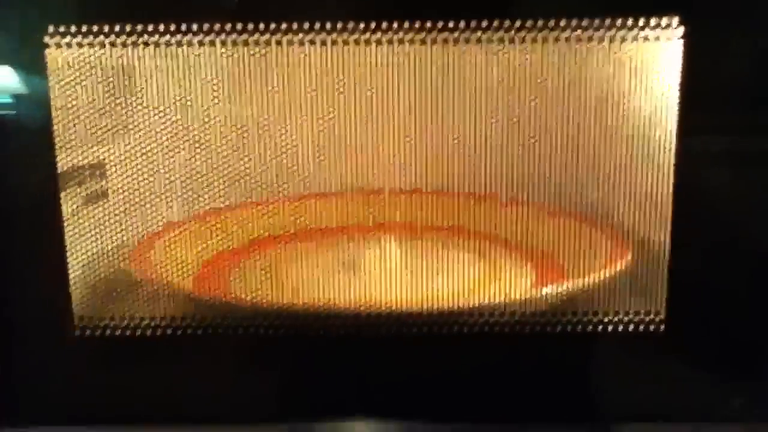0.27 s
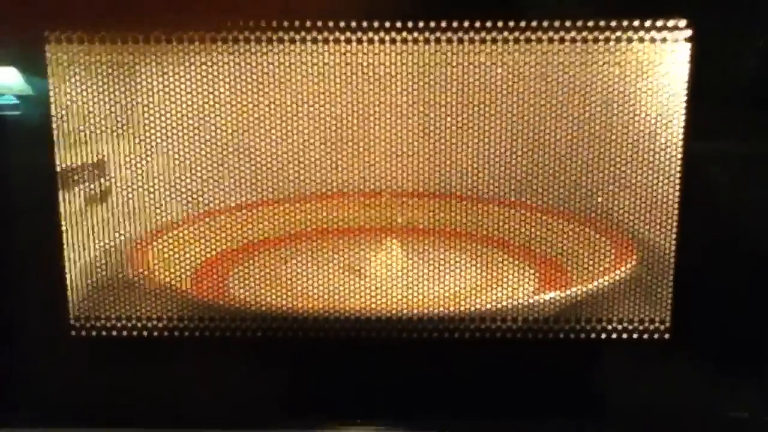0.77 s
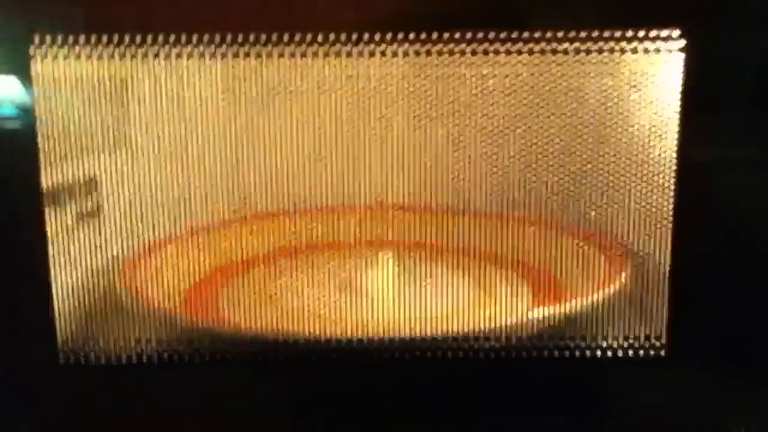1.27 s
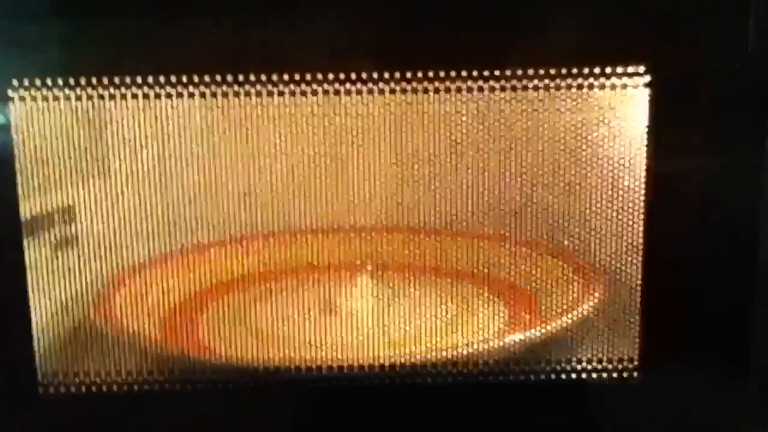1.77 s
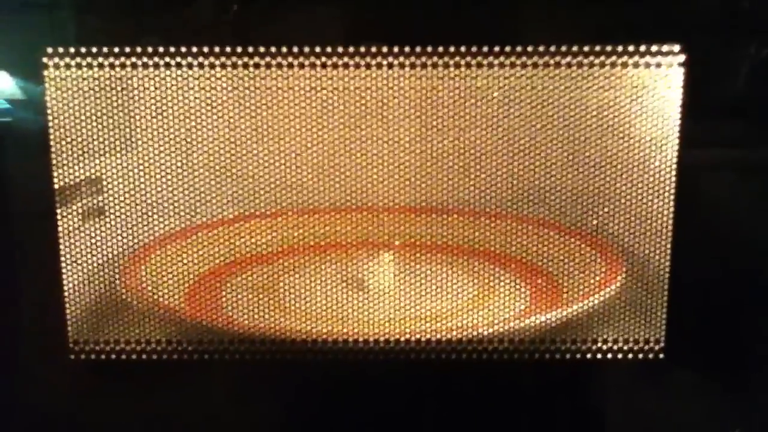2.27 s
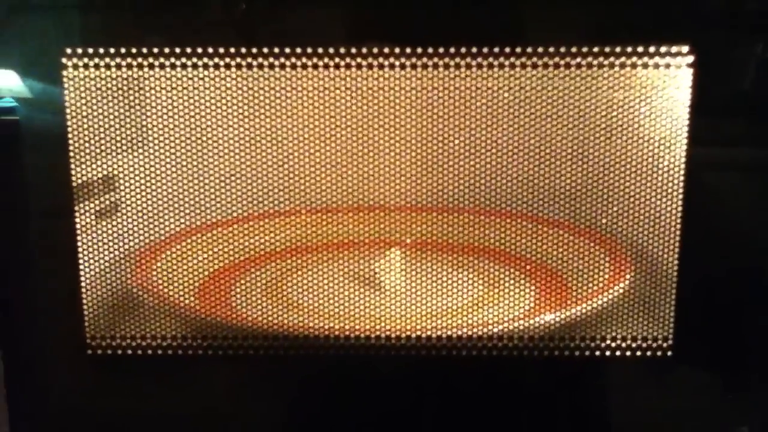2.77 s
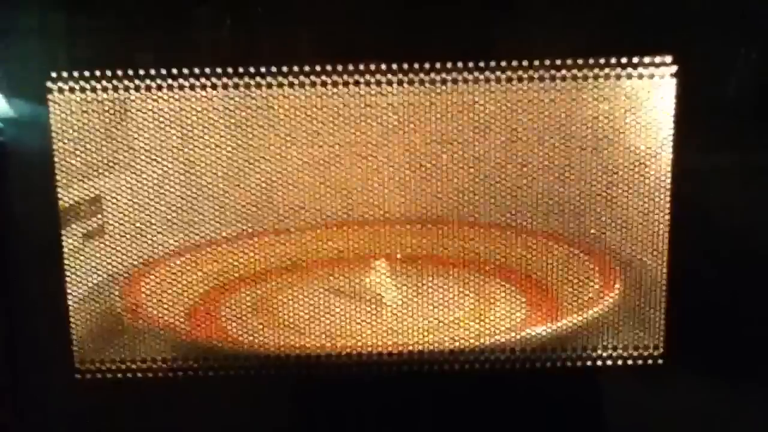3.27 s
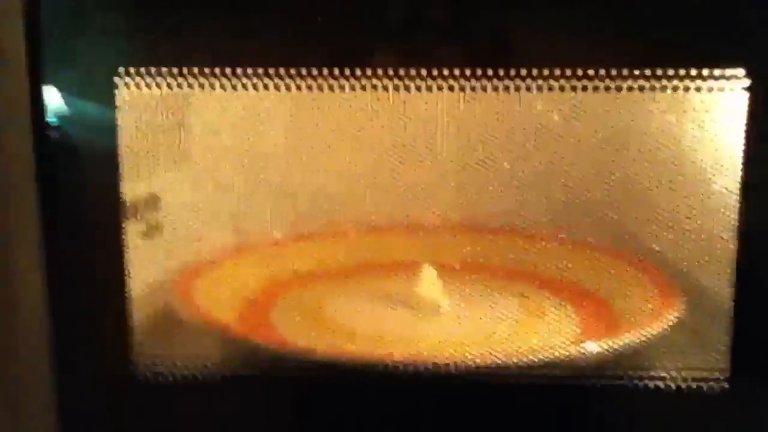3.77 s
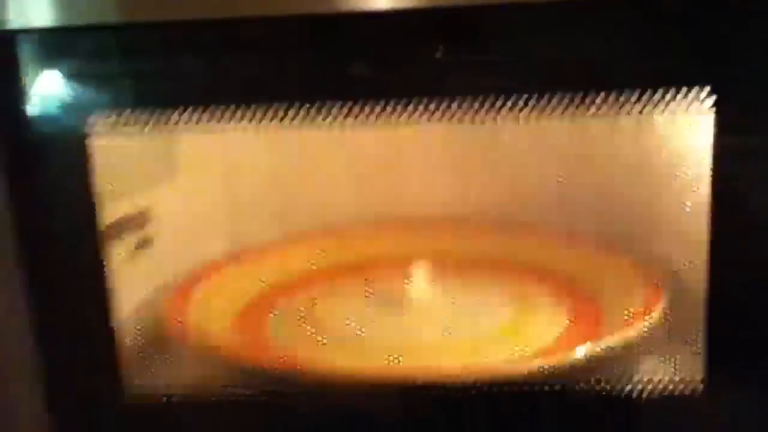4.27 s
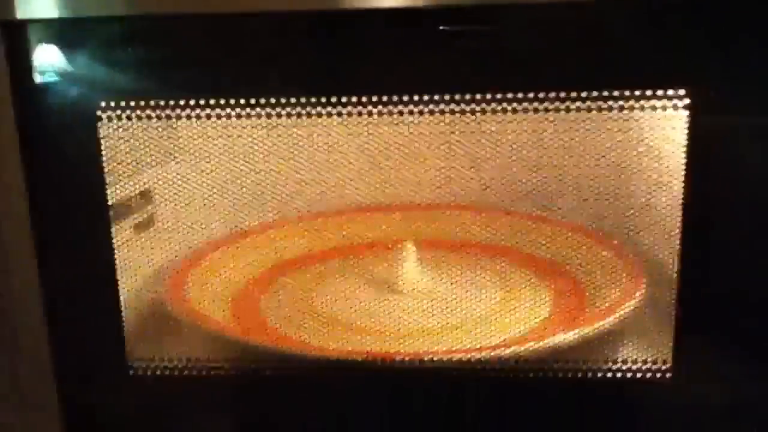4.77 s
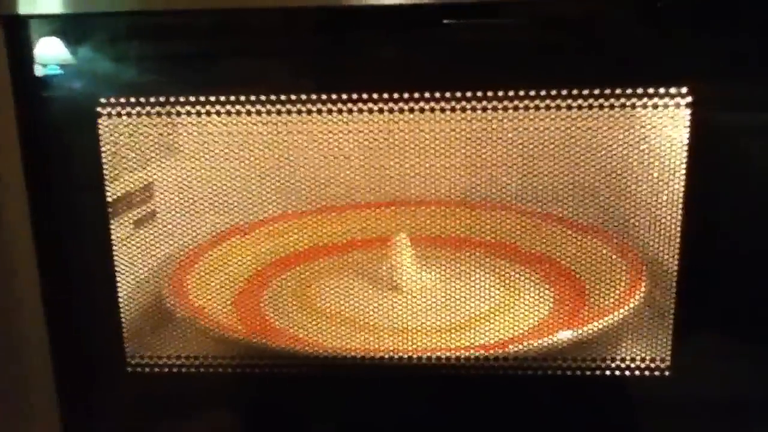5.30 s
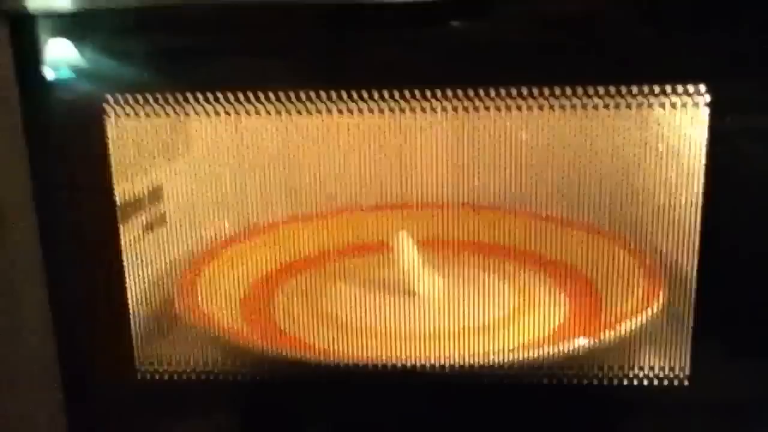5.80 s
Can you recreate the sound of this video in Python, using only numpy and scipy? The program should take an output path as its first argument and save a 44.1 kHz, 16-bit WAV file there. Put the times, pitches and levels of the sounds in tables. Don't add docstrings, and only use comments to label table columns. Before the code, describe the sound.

Steady low electrical hum and fan airflow from a running microwave, broken by faint plate pips, handling snaps and one distant knock.

```python
import sys
import numpy as np
from scipy import signal
from scipy.fft import rfft, irfft
from scipy.io import wavfile
from scipy.ndimage import uniform_filter1d, map_coordinates

SR = 44100
rng = np.random.default_rng(int(sys.argv[2]) if len(sys.argv) > 2 else 0)


def put_to_file(sound):
    columns = np.atleast_2d(sound).T
    safe = np.clip(columns, -1, 1)
    whole_steps = np.round(safe * 32767)
    wavfile.write(sys.argv[1], SR, whole_steps.astype(np.int16))


def volts_from_db(level):
    exponent = np.asarray(level, float) / 20
    return 10 ** exponent


N = 266364
T = np.arange(N) / SR
MAINS_HZ = 59.963

# t/s, share of the way/0-1
DRIFT = [(0, 0.05), (.5, 0.2), (1.5, 0.22), (2.4, 0.33), (3.8, 0.43), (4.7, .69), (5.5, 0.79), (6.04, 0.95)]
FADE_DB = -2.5


def unit(x):
    return x / np.sqrt(np.mean(x ** 2) + 1e-20)


def along(points, hz):
    f, v = np.transpose(points)
    return np.interp(np.log(hz + 1), np.log(f + 1), v)


def curves(rows):
    s, *cols = np.transpose(rows)
    return [np.interp(T, s, c) for c in cols]


def wobble(rate):
    return map_coordinates(rng.standard_normal(200), [np.clip(T * rate, 0, 198)])


def coloured(x, gain_db):
    hz = np.fft.rfftfreq(len(x), 1 / SR)
    return irfft(rfft(x) * volts_from_db(gain_db(hz)), len(x))


def bell(centre_hz, octaves):
    return lambda hz: np.maximum(-6 * (np.log2((hz + 1) / centre_hz) / octaves) ** 2, -120)


def lifts(modes, hz):
    return sum(db / (1 + (2 * (hz - centre) / width) ** 2) for centre, width, db in modes)


def add(track, s, sound):
    part = track[max(round(s * SR), 0):][:len(sound)]
    part += sound[:len(part)]


def tone(turns, db, drift_db):
    level = np.sqrt(2) * volts_from_db(db + drift_db * wobble(1.61))
    return level * np.sin(2 * np.pi * (turns + rng.random()))


def transformer():
    # multiple of the mains, level/dB
    hum = [(1, -70), (2, -41), (3, -51.5), (10, -64), (12, -52.5), (14, -50.5), (15, -63.5), (16, -59.5),
           (17, -70.5), (18, -67), (20, -69), (22, -59), (24, -68), (25, -80), (26, -78), (27, -69),
           (28, -62), (33, -67.5)]
    # multiple, level/dB, echo share/0-1,
    # share of the way where loudest/0-1, swells over the way
    panels = [(4, -48, 0.27, -0.043, .9), (6, -36.5, 0.49, 0.55, 0.76), (7, -53, 0.57, 0.41, 1.84),
              (8, -46, 0.21, 0.058, 0.94)]
    way, = curves(DRIFT)
    out = sum(tone(k * MAINS_HZ * T, db, drift_db=0.76) for k, db in hum)
    for k, db, echo, loudest, swells in panels:
        standing = np.abs(1 + echo * np.exp(2j * np.pi * swells * (way - loudest)))
        out += standing * tone(k * MAINS_HZ * T, db + FADE_DB * way, drift_db=-0.5)
    return out


def laminations():
    # f/Hz, level of each line/dB
    buzz = [(2000, -79.5), (3500, -75.5), (5500, -87), (8000, -91), (11500, -95), (15000, -100)]
    k = np.arange(34, 256)
    uneven_db = 6.0 * rng.standard_normal(len(k)).clip(-3, 1.4)
    odd_db = -2.3 * (k % 2)
    lines = volts_from_db(along(buzz, k * MAINS_HZ) + uneven_db + odd_db)
    spectrum = np.pad(lines * np.exp(2j * np.pi * rng.random(len(k))), (34, 4097 - 256))
    cycle = irfft(spectrum) * 4096 * np.sqrt(2)
    return np.interp(T * MAINS_HZ % 1 * 8192, np.arange(8192), cycle, period=8192)


def fan():
    # t/s, turns a second/Hz
    shaft = [(0, 38.18), (1.5, 38.19), (3.5, 38.187), (4.2, 38.165), (6.04, 38.172)]
    # multiple of shaft, multiple of mains added, level/dB
    fan_lines = [(1, 0, -61.5), (4, 0, -34.5), (8, -2, -50), (8, 0, -73.5), (12, 0, -58), (16, 0, -58),
                 (18, -2, -68), (18, 0, -60), (18, 2, -68), (28, 0, -77), (36, 0, -69), (36, 2, -63)]
    turns = np.cumsum(curves(shaft)[0] + 0.013 * wobble(3.92)) / SR
    return sum(tone(k * turns + m * MAINS_HZ * T, db, drift_db=0.0) for k, m, db in fan_lines)


def rush(spectrum, patchy_db):
    # f/Hz, width/Hz, lift/dB
    duct = [(145, 7.8, 11.5), (166, 11.3, 9.5), (275, 28, 2), (348, 11, 4.5), (376, 44, 4), (464, 41, 3),
            (698, 180, 1), (802, 36, 4), (1224, 88, 5), (1284, 20, 3), (1594, 120, 5), (1795, 87, 7),
            (1980, 50, 2), (2280, 63, 2.5), (2760, 155, 5.5), (2980, 74, 7), (4080, 120, 2),
            (4400, 130, 1.5), (11800, 1500, 1)]
    z = signal.stft(rng.standard_normal(N + 512), nperseg=512)[2]
    field = uniform_filter1d(rng.standard_normal(z.shape), size=6, axis=0)
    field = uniform_filter1d(field, size=14, axis=1)
    noise = signal.istft(z * volts_from_db(patchy_db * unit(field)), nperseg=512)[1][:N]
    return unit(coloured(noise, lambda hz: along(spectrum, hz) + lifts(duct, hz)))


def air():
    # f/Hz, level/dB per Hz
    rumble_colour = [(8, -46), (14, -11), (22, 0.5), (38, 3.5), (55, -8.5), (90, -7), (115, -11.5),
                     (200, -11.5), (320, -16.5), (500, -30), (800, -66)]
    # f/Hz, level/dB per Hz
    body_colour = [(150, -12.5), (300, 2.5), (450, 3), (560, -1.5), (1000, -1), (1500, -4), (2000, -6.5),
                   (2600, -11), (4000, -38), (6000, -60)]
    # f/Hz, level/dB per Hz
    hiss_colour = [(1200, -52), (2200, -3), (3300, 0.5), (5000, -1.5), (7500, -7.5), (10000, -12.5),
                   (13000, -17), (16500, -21.5)]
    way, = curves(DRIFT)
    gust = wobble(7.6)
    rumble = volts_from_db(-38.5 + 0.44 * gust) * rush(rumble_colour, patchy_db=-1.25)
    body = volts_from_db(-41.5 + 0.58 * gust) * rush(body_colour, patchy_db=1.04)
    hiss = volts_from_db(-50.5 + 0.27 * gust) * rush(hiss_colour, patchy_db=1.1)
    return volts_from_db(FADE_DB * way) * (rumble + body + hiss)


def finger_ticks():
    # t/s, peak level/dB, centre f/Hz, width/octaves, time to fall 60 dB/s
    ticks = [(.2859, -47, 12500, .3, .006), (1.0752, -32, 4000, 1.4, 0.0079), (1.1283, -44, 9000, .8, .012),
             (1.6912, -48, 11000, .4, .008), (3.9445, -40, 6000, .8, .012), (3.949, -40, 9500, 0.56, 0.039),
             (3.9507, -38, 2800, 0.55, 0.0057), (3.9527, -34, 5800, 0.43, 0.0043),
             (4.713, -38.5, 5270, 0.52, 0.017), (4.7115, -49, 9500, .6, 0.069),
             (4.717, -42, 4300, 0.34, .02), (4.728, -42, 4000, .6, .02), (4.756, -51, 6000, .4, .03),
             (4.8022, -52, 11000, .6, .015)]
    out, t = np.zeros(N), np.arange(4096) / SR
    for s, db, hz, octaves, t60 in ticks:
        burst = unit(coloured(rng.standard_normal(len(t)), bell(hz, octaves)))
        add(out, s, volts_from_db(db - 60 * t / t60) * burst)
    return out


def skin_creaks():
    # start t/s, end t/s, level/dB, centre f/Hz, slips a second/Hz
    creaks = [(0, 0.052, -61, 11000, 600), (1.74, 1.8, -60, 13000, 300), (1.84, 1.88, -63, 12500, 400),
              (2.48, 2.54, -63, 9000, 700), (3.861, 3.967, -52.5, 12000, 410), (4.28, 4.42, -55, 3000, 900),
              (5.068, 5.205, -62, 11000, 800)]
    out, t = np.zeros(N), np.arange(200) / SR
    for start, end, db, hz, rate in creaks:
        u = np.arange(8192) / SR / (end - start)
        slips = (rng.random(len(u)) < rate / SR) * volts_from_db(3.3 * rng.standard_normal(len(u)))
        grain = np.convolve(slips, volts_from_db(-60 * t / .003))[:len(u)] + 0.45
        drag = unit(coloured(grain * rng.standard_normal(len(u)), bell(hz, 0.5)))
        swell = np.sqrt(np.sin(np.pi * np.clip(u, 0, 1)).clip(0))
        add(out, start, volts_from_db(db) * drag * swell)
    return out


def snaps():
    snap_times = (1.0756, 3.947, 3.953)
    # peak level/dB, f/Hz, half length/s
    snap_modes = [
        [(-26.5, 1100, 0.00064), (-34, 2600, .0003), (-39, 4800, .00012), (-28, 6500, .0002),
         (-36, 11000, 0.00011), (-34, 13000, .00022)],
        [(-40, 3200, .0002), (-31, 4200, .00022), (-34, 8200, 0.00014), (-38, 9100, .0001),
         (-27, 13500, .00015)],
        [(-38, 3400, 0.00025), (-35, 4000, 0.00025), (-30, 6700, .0003), (-28, 8100, 0.00031),
         (-23, 11700, 0.00027), (-35, 15300, .00025)],
    ]
    out, t = np.zeros(N), np.arange(-220, 220) / SR
    for s, modes in zip(snap_times, snap_modes):
        burst = np.zeros(len(t))
        for db, hz, half in modes:
            push = volts_from_db(db) * np.exp(-(t / half) ** 2 / 2)
            burst += push * np.cos(2 * np.pi * (hz * t + rng.random()))
        add(out, s + t[0], burst)
    return out


def struck(modes, blows):
    out, t = np.zeros(N), np.arange(SR // 4) / SR
    ring = np.zeros(len(t))
    for hz, db, t60 in modes:
        onset = 1 - np.exp(-t * hz / 0.14)
        ring += volts_from_db(db - 60 * t / t60) * np.sin(2 * np.pi * hz * t) * onset
    for s, db in blows:
        add(out, s, volts_from_db(db) * ring)
    return out


def turning_plate():
    # f/Hz, level/dB, time to fall 60 dB/s
    plate, roller = [(2240, -3, 0.013), (2225, -9, 0.08), (1750, -6, .01)], [(2970, 0, 0.027)]
    # t/s, level/dB
    pips, taps = [(1.972, -29.5), (3.3073, -32)], [(3.808, -36)]
    return struck(plate, pips) + struck(roller, taps)


def thumb():
    # f/Hz, level/dB, time to fall 60 dB/s
    shell, button = [(228, -1.5, 0.11), (165, -3, 0.067), (292, -5, .07), (345, -12, 0.057),
                     (414, -9.5, 0.067)], [(1090, -1, .016), (3000, -8, .01)]
    # t/s, level/dB
    thuds, presses = [(4.718, -24)], [(4.728, -27)]
    return struck(shell, thuds) + struck(button, presses)


def object_ring():
    # f/Hz, level/dB, time to fall 60 dB/s
    rim, base = [(1780, -3, 0.034), (2800, -1.5, 0.021)], [(705, -3.5, 0.14), (942, -3.5, 0.14), (1930, -5, 0.17), (2200, -4.5, 0.12),
                              (4270, -3, .035)]
    # t/s, level/dB
    rim_blows, base_blows = [(.398, -29)], [(.411, -33.5), (.441, -39), (.479, -42)]
    return struck(rim, rim_blows) + struck(base, base_blows)


def object_knock():
    # t/s, level/dB
    knocks = [
        (.3972, -34.5),
        (.411, -35),
        (.44, -45),
        (0.479, -49),
    ]
    # f/Hz, level/dB per Hz
    knock_colour = [(300, -25), (600, 2), (2000, -2), (4500, -5), (9000, -9.5), (13000, -20), (16000, -29)]
    # f/Hz, width/Hz, lift/dB
    counter = [(705, 98, 8), (935, 51, 1), (1590, 40, 2), (1930, 48, 8), (2200, 41, 10), (2850, 100, 8)]
    # f/Hz, time to fall 60 dB/s
    room = [(500, 0.37), (3000, 0.22), (10000, 0.14), (15000, .08)]
    out = np.zeros(N)
    for s, db in knocks:
        noise = rng.standard_normal(SR // 2)
        noise = unit(coloured(noise, lambda f: along(knock_colour, f) + lifts(counter, f)))
        hz, t, z = signal.stft(noise, SR, nperseg=128)
        decay = volts_from_db(-60 * t / along(room, hz)[:, None])
        add(out, s, volts_from_db(db) * signal.istft(z * decay, SR, nperseg=128)[1])
    return out


def kitchen():
    # f/Hz, level/dB
    kitchen_tones = [(83.02, -51), (14994, -86)]
    return sum(tone(hz * T, db, drift_db=0.0) for hz, db in kitchen_tones)


def scene():
    oven = transformer() + laminations() + fan() + air() + turning_plate()
    hand = finger_ticks() + skin_creaks() + snaps() + thumb()
    return (oven + hand + object_ring() + object_knock() + kitchen())[None]


def band_limit(x):
    return signal.sosfilt(signal.butter(12, 16230, fs=SR, output="sos"), x)


def record(dry):
    band = coloured(dry[0], lambda hz: -40.0 * (hz > 15800))[None]
    return band_limit(band)


dry = scene()
out = record(dry)
put_to_file(out)
```